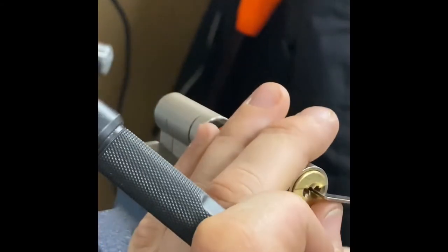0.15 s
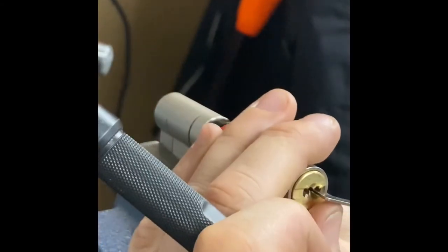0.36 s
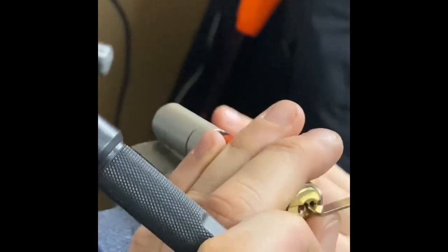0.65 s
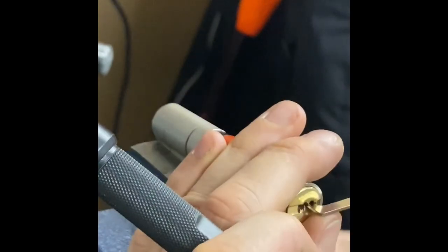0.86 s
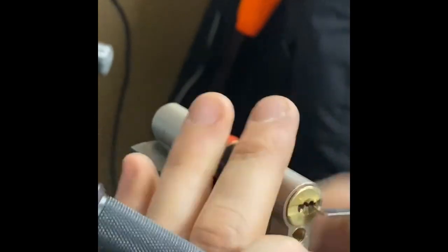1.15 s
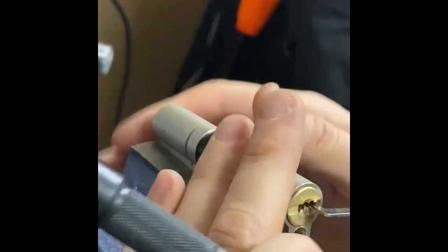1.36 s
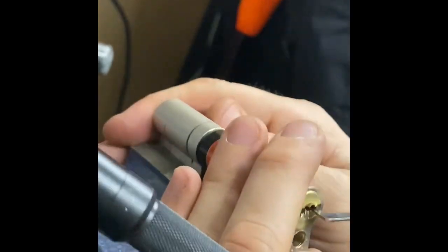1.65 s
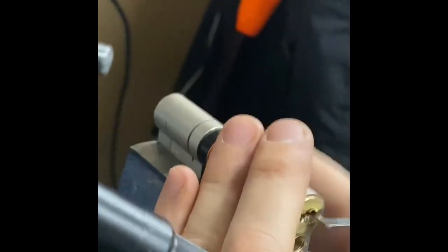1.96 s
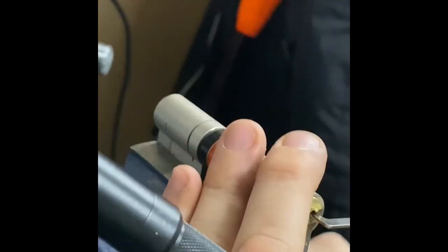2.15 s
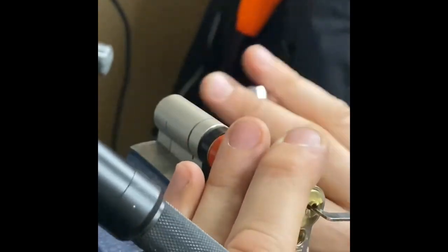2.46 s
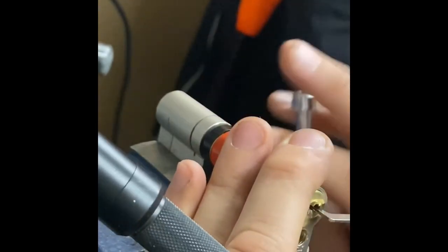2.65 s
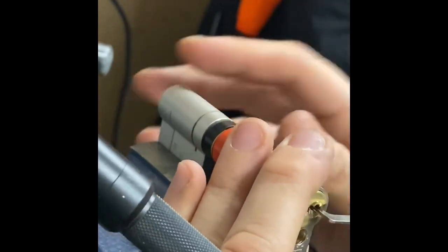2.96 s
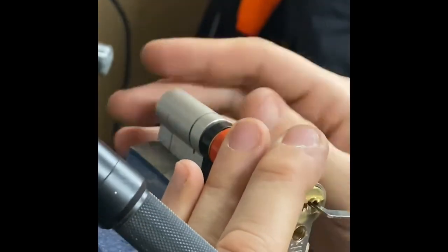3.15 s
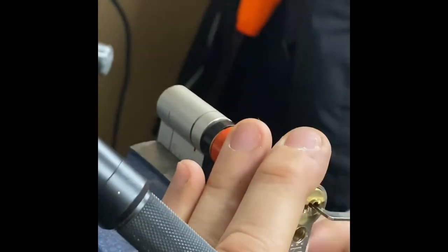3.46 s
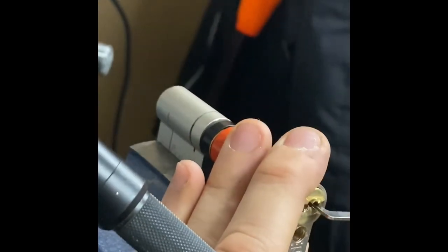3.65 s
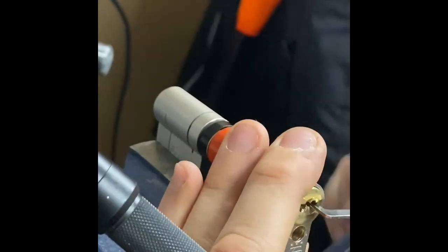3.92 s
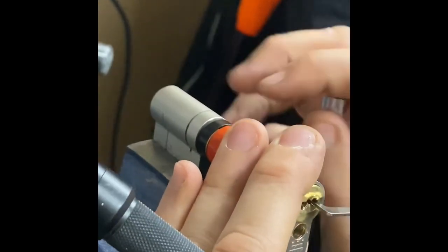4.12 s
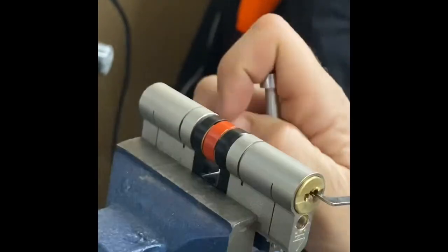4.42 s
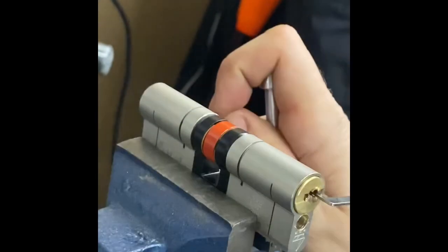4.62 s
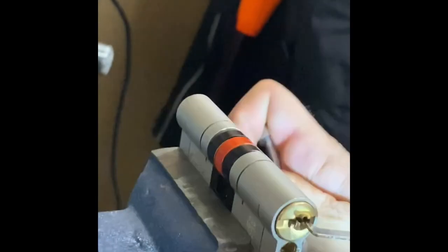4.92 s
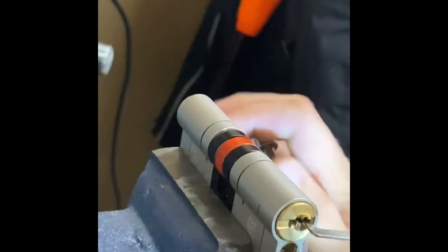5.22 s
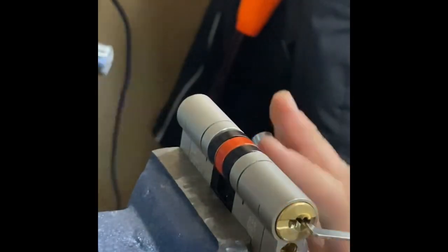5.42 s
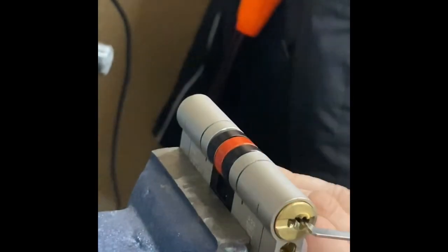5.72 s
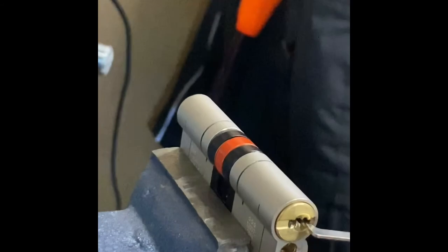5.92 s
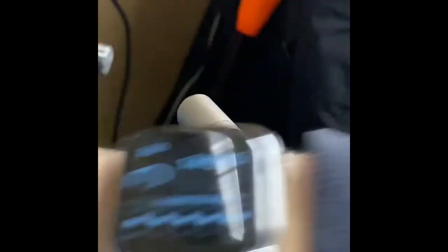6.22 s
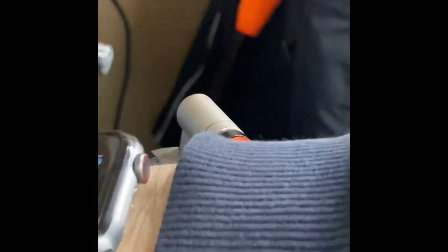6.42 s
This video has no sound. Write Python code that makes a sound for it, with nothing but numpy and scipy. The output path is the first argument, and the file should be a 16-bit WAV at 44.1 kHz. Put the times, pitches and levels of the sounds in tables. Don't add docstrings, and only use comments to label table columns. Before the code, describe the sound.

Very close, mostly quiet handling of a lock cylinder in a vise, over steady soft workshop air. At 0.35-0.6 s a cluster of dull knocks, crisp clicks and a short metallic scrape, with low bench movement. Light ticks and scrapes return around 0.95-1.2 s, then faint rubs. Near 1.8 s a small tick; at 2.05-2.2 s firmer clicks and a dull knock. Light grazes at 2.6 s lead to the loudest event at 2.74 s: a hard, bright steel clack with a tiny bounce and airy shivering tail. Soft rubs follow near 3.0-3.4 s, a sharp bright tap at 3.5 s, a thin ping at 3.85 s. Low hand thumps land at 4.2 and 4.6 s, with scraping to 4.8 s. A softer thump at 5.5 s, a stuttering, low-pitched skid at 5.7-6.0 s, then a brief brush at 6.23 s and quiet.

```python
import sys
import numpy as np
from scipy import signal
from scipy.fft import rfft, irfft, next_fast_len
from scipy.io import wavfile
from scipy.ndimage import uniform_filter1d

SR = 44100
rng = np.random.default_rng(int(sys.argv[2]) if len(sys.argv) > 2 else 0)


def inscribe(sig):
    pcm = np.round(np.clip(np.atleast_2d(sig).T, -1, 1) * 32767)
    wavfile.write(sys.argv[1], SR, pcm.astype(np.int16))


def gain_from_db(level_db):
    decades = np.asarray(level_db, float) / 20
    return 10 ** decades


N = 290166

# (lower edge [Hz], upper edge [Hz])
BANDS = [(230, 950), (950, 2450), (2750, 8500), (8500, 15800)]
# (frequency [Hz], level [dB], t60 [s])
LOCK_MODES = [(340, 0.5, 0.007), (420, 9, 0.01), (556, -3.5, 0.013), (854, -4, 0.035), (1090, -5, 0.0071),
              (1155, -4, 0.044), (1760, 6.5, 0.0084), (1940, -1, 0.0056), (2540, 0.5, 0.0075),
              (3850, -6, 0.0035), (4420, -4.5, 0.0098), (5160, -5.5, 0.017), (5760, -5.5, 0.051),
              (6220, -1.5, 0.022), (7004, -8, 0.0094), (8000, -9, 0.016), (10900, 1.5, 0.0079),
              (11800, -1, 0.015), (14100, -3, .01)]
CLICK_TICK_DB = [-1, -4, 1, -1.5]
RUB_TICK_DB = [1.3, 3.5, 6.1, 5]
# (time [s], peak [dB], weight [dB], hardness [dB], pitch of part touched [Hz])
STEEL_TICKS = [(0.4362, -33, -24, -4, 1740), (0.5645, -43, -2, -27, 1125), (0.9615, -53.5, 5, -11, 1820),
               (1.0217, -45, 11.5, -3.5, 1700), (1.065, -54, 8, -2, 1810), (1.2024, -59, -17, 3, 1790),
               (1.2171, -57.5, -15, 5.5, 1700), (1.789, -46.5, -2.5, -2.5, 1096),
               (2.055, -41, -1, -0.5, 1760), (2.1121, -36.5, -16, -5, 872), (2.611, -40, 9.5, -3, 1870),
               (2.6259, -42, 13, -30.5, 1860), (2.6378, -40.5, -12.5, -7.5, 1870),
               (3.5, -28.5, 4.5, -8, 1747), (3.6304, -65, 11, 6, 780), (3.8445, -49.5, -33.5, 6.5, 1720),
               (3.8796, -63.5, -15, -5, 1660), (4.1652, -42.5, -7, -23, 2640), (4.2005, -54.5, 0, 6, 760),
               (4.3702, -68, -11, 13, 1947), (4.6448, -46, -4.5, -11, 1158), (5.0492, -68.5, 0, 5, 1760),
               (5.651, -66.5, -6, 8.5, 1780), (5.7172, -62.5, 0, 10, 1856)]
# (time [s], peak [dB], weight [dB], hardness [dB], pitch [Hz])
HANDLE_KNOCKS = [(0.2318, -57, 5, -39, 875), (0.3456, -55, 15, -32, 870), (0.3674, -39.5, 6, -31, 720),
                 (0.3915, -34.5, -25, -20.5, 740), (1.0984, -37.5, 5.5, -12.5, 1940),
                 (1.136, -45.5, 3, -32, 2450), (1.15, -55, 15, -28, 1310), (1.1577, -43.5, -6, -43, 1820),
                 (1.1656, -51.5, 15, -29, 1890), (1.46, -54, -27, -35, 1134), (1.6324, -54, -4, -8, 1840),
                 (1.8664, -61.5, -16, -11, 1260), (1.961, -62, -22, -18, 2020),
                 (2.1274, -34, -13, -33, 756), (2.1908, -56.5, 14.5, -31, 750),
                 (3.1364, -50.5, 10, -49.5, 1540), (3.3043, -52, -4, -33.5, 1260),
                 (3.3495, -44, -18.5, -39, 1748), (4.0686, -59, -19, -17, 888),
                 (4.1731, -50, -11.5, -14, 718.5), (4.58, -45.5, 9.5, -33, 1120),
                 (5.2004, -64, 5.5, -8, 923), (5.5151, -56, 6.5, -25.5, 1149),
                 (6.2324, -47, -19, -14, 1502)]
SETTLE_DB, SETTLE_S = -13, 0.088
TOP_FOLLOWS = 0.91

# (frequency [Hz], level [dB], t60 [s])
CLACK_MODES = [(164, -17.5, 0.047), (306, -20.5, 0.047), (390, -19.5, 0.054), (470, -17, 0.036),
               (780, -10.5, 0.011), (848, -11.5, 0.021), (1055, -1, 0.016), (1260, -13.5, 0.011),
               (1690, -3.5, 0.018), (1770, -6, 0.018), (2560, -23.5, 0.02), (4970, -7.5, 0.0074),
               (5300, -11.5, 0.012), (6075, -14.5, 0.005), (8100, -12.5, 0.014), (10860, -10, 0.0076)]
# (frequency [Hz], level [dB], t60 [s])
TOOL_MODES = [(5636, 0, .5), (11170, -3, .25), (10710, -12, .15), (8160, -24, .08)]
# (time [s], level [dB], time until gripped [s], overtones [dB])
TOOL_BLOWS = [
    (2.611, -54, 0.3, 4),
    (2.668, -45, 0.31, -4.5),
    (2.7407, -21.5, 0.016, -3.5),
    (2.762, -34, 0.037, 8.5),
    (3.501, -34.5, 0.0067, 10),
]
# (frequency [Hz], level [dB], t60 [s])
PICK_MODES = [(14160, 2, .1), (4200, -13, .05), (6700, -13, .15), (8800, -13, .15), (11350, -6, .15)]
# (time [s], level [dB], time until gripped [s], overtones [dB])
PICK_BLOWS = [
    (3.846, -37.5, 0.03, -8.5),
]
# (time [s], peak [dB], centre [Hz], t60 [s])
PART_SNAPS = [(0.37, -63, 5700, 0.018), (.424, -48, 4500, 0.014), (0.4354, -39, 6400, 0.012),
              (0.4338, -42, 4100, .008), (.45, -50, 8500, .02), (0.565, -51, 5240, 0.0082),
              (.9467, -68, 2860, 0.014), (0.9613, -60, 5400, 0.047), (1.029, -59, 6450, 0.0084),
              (1.058, -65, 4270, 0.021), (1.079, -65, 4300, .012), (1.151, -45, 1700, 0.0075),
              (1.1498, -66, 5330, 0.0087), (1.1685, -49, 2310, 0.011), (1.201, -76, 6250, .03),
              (1.631, -60, 1490, 0.012), (1.79, -48, 3550, 0.0096), (1.789, -67, 9100, 0.011),
              (1.979, -65.5, 2780, 0.15), (2.1108, -43.5, 2930, 0.017), (2.1124, -44, 9200, .012),
              (2.127, -45.5, 6070, 0.01), (2.1907, -47.5, 895, 0.02), (2.7408, -18.5, 14200, .015),
              (2.7406, -17, 10370, .012), (2.7411, -13.5, 5702, .012), (3.8445, -45.5, 15300, .03),
              (3.8445, -50, 10500, .02), (2.757, -34, 14700, .06), (3.35, -70, 5990, .015),
              (3.4978, -33, 10900, 0.017), (3.499, -27, 5570, 0.0394), (3.5026, -33, 7200, .03),
              (3.5022, -36, 11400, 0.05), (3.8435, -43.5, 3520, 0.013), (3.85, -60.5, 710, 0.055),
              (3.8448, -50, 10960, .015), (3.8423, -46, 13470, 0.032), (4.166, -47, 3470, 0.011),
              (4.173, -46, 2570, 0.011), (4.176, -55, 3635, 0.013), (4.26, -67, 3900, 0.054),
              (4.58, -43, 1052, 0.022), (4.587, -45.5, 847, 0.011), (5.187, -57, 674, 0.041),
              (5.514, -53, 1010, 0.017), (5.521, -49.5, 590, 0.018), (5.661, -70, 4500, 0.013),
              (5.7192, -52, 4260, 0.012), (5.861, -65, 2450, 0.034), (5.862, -68.5, 3990, 0.024),
              (5.952, -60, 1880, 0.04), (5.955, -62.5, 3984, 0.031)]
# (time [s], peak [dB], centre [Hz], t60 [s])
PART_SHIVERS = [
    (2.749, -33.5, 11000, 0.29),
    (2.747, -39, 7460, 0.37),
    (2.748, -43, 4130, 0.19),
    (2.748, -47, 3088, 0.28),
    (3.508, -46, 11000, 0.21),
    (3.508, -45.5, 5940, 0.23),
    (3.867, -52, 13300, .1),
    (2.75, -42, 9895, .2),
    (4.18, -53, 900, 0.15),
    (5.726, -67, 1838, 0.3),
]

# (time of full pressure [s], rms [dB], rise [s], fall [s], hardness [dB])
FINGER_STROKES = [(.374, -63, 0.015, 0.059, -49), (.576, -64.5, 0.38, 0.056, -42),
                  (.76, -78.5, 0.018, 0.28, -23), (.86, -72, 0.32, 0.056, -13),
                  (1.468, -81, 0.013, 0.042, -23), (1.638, -60.5, 0.092, 0.028, -26),
                  (1.5, -96, 0.099, 0.24, 14.5), (1.99, -86, 0.03, 0.29, -3.5), (2.34, -74, 0.2, 0.17, -18),
                  (3.015, -70, 0.041, 0.052, -36.5), (3.045, -59.5, 0.052, 0.031, -42),
                  (3.134, -65, 0.024, 0.079, -40.5), (3.358, -60.5, 0.077, 0.066, -28.5),
                  (3.49, -72.5, 0.064, 0.022, -10), (4.062, -75.5, 0.04, 0.054, -12),
                  (4.59, -56.5, 0.0074, 0.019, -28), (5.054, -67, 0.091, 0.08, -6),
                  (5.202, -67, 0.065, 0.25, -19), (5.535, -68, 0.027, 0.087, -22),
                  (5.6, -69, 0.33, 0.17, -16.5)]
# (time of full pressure [s], rms [dB], rise [s], fall [s], hardness [dB])
SCRAPE_STROKES = [(.436, -46, 0.071, 0.085, -18.5), (.964, -52, 0.009, 0.04, -15.5),
                  (1.04, -65.5, 0.07, 0.082, -10.5), (1.152, -64.5, 0.12, 0.17, -12.5),
                  (1.81, -68, 0.039, 0.031, 1.5), (2.065, -48.5, 0.013, 0.032, -21),
                  (2.135, -61.5, 0.12, 0.18, -39), (2.62, -59, 0.011, 0.19, -8),
                  (2.674, -61, 0.13, 0.076, -15.5), (2.736, -47, 0.019, .012, -12),
                  (3.52, -59.5, 0.047, 0.21, -34), (3.87, -71, 0.072, 0.048, 3),
                  (4.17, -54, 0.012, 0.12, -10.5), (4.372, -80.5, .015, 0.28, 5),
                  (4.67, -56, 0.041, 0.065, -11.5), (4.715, -54, 0.12, 0.077, -15.5),
                  (4.76, -57.5, 0.06, 0.069, -20), (4.82, -73, 0.083, 0.13, -7),
                  (5.724, -71, 0.0502, 0.13, -1.5), (5.95, -71, 0.24, 0.52, -4.5),
                  (6.234, -55, 0.078, 0.061, -2), (6.3, -76, 0.078, 0.41, -6)]
LINGER = [0.87, 1, 0.96, 0.6]
# (time of full pressure [s], rms [dB], pitch [Hz], rise [s], fall [s])
PART_SINGS = [(.40, -66, 5660, 0.019, 0.08), (.41, -59, 3620, 0.026, 0.086), (.41, -46, 1695, 0.02, 0.078),
              (.428, -54, 2550, 0.012, .04), (.535, -73, 3500, 0.027, 0.071),
              (0.821, -76.5, 1740, 0.077, .1), (.975, -73, 5670, 0.023, 0.021),
              (.975, -65.5, 4280, 0.015, 0.018), (1.07, -63, 4380, 0.011, 0.017),
              (1.075, -67, 2520, 0.035, 0.058), (1.065, -80, 6500, .02, 0.061),
              (1.15, -86, 5800, 0.068, 0.033), (1.15, -65, 4160, 0.026, 0.02),
              (1.215, -66, 6300, 0.015, 0.017), (1.222, -64, 4260, 0.0086, 0.013),
              (1.225, -65.5, 1760, 0.049, 0.032), (1.26, -67, 2380, .03, 0.013),
              (2.736, -33.5, 1154, 0.011, 0.007), (2.78, -46.5, 1590, 0.044, 0.081),
              (2.8, -48.5, 1747, .04, 0.12), (2.78, -44, 1000, 0.041, 0.095),
              (2.775, -53.5, 672, .02, 0.13), (2.79, -49, 5550, .03, 0.097),
              (2.77, -51.5, 1270, 0.019, 0.086), (3.03, -58, 1710, 0.038, 0.04),
              (3.025, -59.5, 1135, 0.037, 0.042), (3.04, -54, 406.5, 0.039, 0.043),
              (3.138, -59.5, 1580, 0.022, 0.039), (3.145, -57, 475, 0.044, 0.052),
              (4.70, -73, 4240, 0.09, 0.12), (4.70, -64.5, 2530, .06, 0.043),
              (4.70, -54, 1160, 0.12, 0.084), (4.71, -59, 1660, 0.14, 0.14), (4.70, -92, 3050, .1, 0.14),
              (5.56, -68.5, 2220, 0.058, 0.14), (5.56, -67.5, 1283, .05, 0.093),
              (3.359, -61, 1747, 0.028, 0.045), (5.75, -70.5, 1825, .05, 0.11),
              (5.93, -71.5, 2050, 0.088, .12), (6.238, -60, 1990, .03, 0.029), (6.235, -70, 2880, .06, .06)]

# (time [s], level [dB], pitch [Hz], t60 [s])
SKIDS = [
    (5.724, -66.5, 376, 0.069),
    (5.762, -47.5, 406, 0.03),
    (5.808, -45.5, 447, 0.03),
    (5.855, -49.5, 453, 0.046),
    (5.903, -53, 438.4, 0.058),
    (5.95, -46, 447.7, 0.042),
    (5.999, -59, 462.5, 0.028),
]
# (time [s], peak [dB], pitch [Hz], t60 [s])
HAND_THUMPS = [
    (4.218, -23, 94, 0.061),
    (4.598, -20.5, 114.7, 0.046),
    (4.796, -44, 110.6, 0.067),
    (5.529, -34.5, 114.9, 0.064),
]
# (frequency [Hz], width [Hz])
BENCH_MODES = [(66, 41), (122, 55)]
# (time of full push [s], sway rms [dB], drumming above sway [dB], fade [s])
BENCH_PUSHES = [(0.0, -79, 0, 0.11), (0.389, -46, 8.5, 0.046), (0.486, -34.5, -3.5, 0.12),
                (0.578, -45, -1, 0.037), (0.856, -53, 0, 0.063), (1.036, -45.5, -4.5, 0.049),
                (1.15, -33.5, -30, 0.099), (1.38, -60.5, -25, 0.058), (1.676, -53, -14.5, 0.12),
                (1.915, -43, -15, 0.046), (2.091, -49, -16, 0.17), (2.378, -54.5, 5.5, 0.097),
                (2.661, -62.5, 1, 0.15), (2.769, -40.5, 0, 0.11), (3.049, -70.5, 2.5, 0.13),
                (3.4, -53.5, 2, 0.1), (3.548, -51.5, 4, 0.14), (3.88, -64.5, -1.5, 0.081),
                (4.251, -40.5, -5, 0.12), (4.496, -55, -42, 0.1), (4.63, -41.5, -2, 0.032),
                (4.681, -44.5, -3, 0.16), (4.82, -42, 0.5, 0.089), (5.078, -60.5, 5, 0.11),
                (5.272, -53.5, -1, 0.25), (5.545, -48.5, 6, 0.056), (5.79, -51, -12, 0.25),
                (6.03, -62, -3, 0.42), (6.278, -54.5, -6.5, 0.074), (6.47, -59, -18, 0.069)]

# (frequency [Hz], density [dB per Hz])
AIR_SPECTRUM = [(15, -34.5), (25, -17), (59, -0.5), (97, -3.5), (200, -16), (353, -12.5), (752, -27.5),
                (1330, -27.5), (1690, -31), (2680, -40), (4850, -41.5), (5860, -39.5), (15900, -56.5)]
# (frequency [Hz], t60 [s])
SHOP_T60 = [(100, 0.21), (300, 0.42), (1000, 0.14), (5000, 0.25), (12000, 0.24)]
# (frequency [Hz], lead [rad])
PORT_LEAD = [(0, 0), (400, -.2), (800, -.9), (1300, -.2), (1700, .15), (2600, 1.1), (3900, .1), (4620, 1.2),
             (5080, 5.3), (5250, 6.3), (6000, 6.8), (8000, 7.9), (10000, 8.2), (11500, 8.5), (12500, 8.9),
             (16000, 8.9)]
# (frequency [Hz], likeness [0-1])
PORT_SAME = [(100, 0.99), (400, 0.7), (750, 0), (1150, 0), (1600, 0.7), (4200, 0.4), (4700, 1), (5000, 1),
             (5600, 0.2), (9000, 0.93), (12500, 0.8)]
# (frequency [Hz], difference [dB])
PORT_LEFT = [(100, 0), (400, 3), (900, 2.5), (1600, 0), (15000, 0)]


def evened(x):
    return x / np.sqrt(np.mean(x ** 2) + 1e-20)


def read(points, hz):
    f, value = np.transpose(points)
    return np.interp(np.log(hz + 1), np.log(f + 1), value)


def add(mix, s, sound):
    part = mix[..., round(s * SR):][..., :sound.shape[-1]]
    part += sound[..., :part.shape[-1]]


def ring(modes, t):
    return sum(gain_from_db(db - 60 * t / t60) * np.sin(2 * np.pi * hz * t) for hz, db, t60 in modes)


def bandpass(order, edges_hz):
    return signal.butter(N=order, Wn=edges_hz, btype="band", fs=SR, output="sos")


def band_levels(low_db, hard_db, top_db):
    return np.array([low_db, 0, hard_db, top_db + TOP_FOLLOWS * hard_db])


def lock_answers(tick_db, spread_db):
    t = np.arange(2048) / SR
    place = rng.standard_normal((len(LOCK_MODES), 2))
    touched = [(hz * (1 + 0.015 * a), db + spread_db * b, t60)
               for (hz, db, t60), (a, b) in zip(LOCK_MODES, place)]
    answers = []
    for (lo, hi), bare_db in zip(BANDS, tick_db):
        band = bandpass(4, [lo, hi])
        inside = [mode for mode, at_rest in zip(touched, LOCK_MODES) if lo < at_rest[0] < 1.2 * hi]
        modes = signal.sosfilt(band, ring(inside, t))
        tick = signal.sosfilt(band, t == 0)
        answers.append(evened(evened(modes) + gain_from_db(bare_db) * evened(tick)))
    return np.array(answers) / np.sqrt(len(t))


def clicks(contacts, rise_s, rattle_s, top_db):
    out, t = np.zeros(N), np.arange(2048) / SR
    for s, db, weight_db, hard_db, hz in contacts:
        fade = gain_from_db(-60 * t / rattle_s) + gain_from_db(SETTLE_DB - 60 * t / SETTLE_S)
        rattle = rng.standard_normal(len(t)) * fade * (1 - np.exp(-t / rise_s))
        answer = gain_from_db(band_levels(weight_db, hard_db, top_db)) @ lock_answers(CLICK_TICK_DB, spread_db=-0.5)
        part = ring([(hz, 0, 0.012)], t)
        answer = answer + 2.0 * part / np.linalg.norm(part)
        add(out, s, gain_from_db(db - 4.0) * signal.fftconvolve(rattle, answer))
    return out


def clack():
    hit_s, hit_db = 2.7412, 4
    bounce_s, bounce_db = 0.0036, 0.5
    out, t = np.zeros(N), np.arange(6000) / SR
    crack = signal.sosfilt(bandpass(2, [4200, 11300]), rng.standard_normal(len(t)))
    crack = crack * gain_from_db(-9.5 - 60 * t / 0.017) * (1 - np.exp(-t / 0.0032))
    body = sum(ring([mode], t) * (1 - np.exp(-t * mode[0] / 4)) for mode in CLACK_MODES)
    bounce = ring(CLACK_MODES[:11], t * 1.01) * (1 - np.exp(-t / 0.0065))
    add(out, hit_s, gain_from_db(hit_db) * (crack + body))
    add(out, hit_s + bounce_s, gain_from_db(hit_db + bounce_db) * bounce)
    return out


def struck(modes, blows):
    out = np.zeros(N)
    for s, db, held, overtones_db in blows:
        t = np.arange(int(held * SR)) / SR
        steel = ring(modes[:1], t) + gain_from_db(overtones_db) * ring(modes[1:], t)
        edges = np.clip(np.minimum(held - t, t) / 0.0019, 0, 1)
        add(out, s, gain_from_db(db) * steel * edges)
    return out


def snaps():
    width = 0.26
    out, t = np.zeros(N), np.arange(8192) / SR
    for s, db, hz, t60 in PART_SNAPS + PART_SHIVERS:
        burst = rng.standard_normal(len(t)) * gain_from_db(-60 * t / t60) * (1 - np.exp(-t / 0.00018))
        edges = np.minimum(hz * (1 + width / 2) ** np.array([-1, 1]), [15000, 16000])
        burst = signal.sosfilt(bandpass(2, edges), burst)
        add(out, s, gain_from_db(db) * burst / abs(burst).max())
    return out


def swell(s, rise, fall):
    t = np.arange(0, N / SR + 0.01, 0.001)
    return np.minimum((t - s) / max(rise, 0.002), (s - t) / max(fall, 0.002))


def at_samples(level):
    return np.interp(np.arange(N) / SR, np.arange(len(level)) * 0.001, level)


def pressure(strokes, low_db, top_db):
    swing_db, roundness = 30, 0.96
    total = 0
    for s, db, rise, fall, hard_db in strokes:
        drop_db = swing_db * np.outer(LINGER, (-swell(s, rise, fall)) ** roundness)
        total = total + gain_from_db(db + band_levels(low_db, hard_db, top_db)[:, None] - drop_db)
    return total


def rubs():
    size = gain_from_db(0.36 * np.minimum(rng.exponential(1, N), 5))
    slips = rng.standard_normal(N) * size * (rng.random(N) < 1200 / SR)
    grip = evened(uniform_filter1d(rng.standard_normal(N), 300))
    slips = evened((evened(slips) + 0.7 * rng.standard_normal(N)) * gain_from_db(2.5 * grip))
    level = pressure(FINGER_STROKES, low_db=8, top_db=-9) + pressure(SCRAPE_STROKES, low_db=2.5, top_db=-9)
    driven = [slips * at_samples(band) for band in level]
    return signal.oaconvolve(driven, lock_answers(RUB_TICK_DB, spread_db=4.0), axes=1)[:, :N].sum(0)


def sings():
    width, roundness = 0.11, 1.6
    out, t = np.zeros(N), np.arange(-4000, 12000) / SR
    for s, db, hz, rise, fall in PART_SINGS:
        grip = evened(uniform_filter1d(rng.standard_normal(len(t)), size=200))
        slips = rng.standard_normal(len(t)) * gain_from_db(3.6 * grip)
        r = np.exp(-np.pi * width * hz / SR)
        poles = [1, -2 * r * np.cos(2 * np.pi * hz / SR), r * r]
        part = evened(signal.lfilter([1, 0, -1], np.convolve(poles, poles), slips))
        add(out, s + t[0], part * gain_from_db(db - 20 * np.maximum(-t / rise, t / fall) ** roundness))
    return out


def judder():
    out, t = np.zeros(N), np.arange(5000) / SR
    for s, db, hz, t60 in SKIDS:
        wander = uniform_filter1d(rng.standard_normal(len(t)), size=160)
        chatter = 1 + 0.3 * evened(uniform_filter1d(wander, size=160))
        skid = t + 0.24 * np.cumsum(chatter - 1) / SR
        top = ring([(hz, db + 15.0, t60), (hz * 0.99, db + 3.5, t60), (hz * 0.595, db + 0.5, t60)], skid)
        add(out, s, top * chatter * (1 - np.exp(-t / 0.0096)) ** 2 * gain_from_db(7.0))
    return out


def thumps():
    out, t = np.zeros(N), np.arange(5000) / SR
    for s, db, hz, t60 in HAND_THUMPS:
        add(out, s, ring([(hz, db + 7.5, t60)], t) * (1 - np.exp(-t / 0.0066)) ** 2)
    return out


def bench():
    rest_db, swing_db, rise_share = -79, 23.5, 0.86
    t, out = np.arange(N) / SR, np.zeros(N)
    for k, (hz, width) in enumerate(BENCH_MODES):
        level = gain_from_db(rest_db)
        for s, db, drum_db, fall in BENCH_PUSHES:
            level = level + gain_from_db(db + k * drum_db + swing_db * swell(s, rise_share * fall, fall))
        turn, r = np.exp(2j * np.pi * hz * t), np.exp(-np.pi * width / SR)
        poles = np.convolve([1, -r], [1, -r])
        shake = (turn * signal.lfilter([1], poles, rng.standard_normal(N) / turn)).real
        sway = np.sqrt(uniform_filter1d(shake ** 2, 3000))
        out += at_samples(level) * evened(shake / sway)
    return signal.sosfilt(signal.butter(N=3, Wn=38, btype="high", fs=SR, output="sos"), out)


def shop(x):
    taps, slots = np.zeros(SR // 2), np.arange(300, SR // 2 - 20, 20)
    taps[slots + rng.integers(0, 20, len(slots))] = rng.choice([-1., 1.], len(slots))
    hz, t, z = signal.stft(taps, SR, nperseg=256)
    fade = gain_from_db(-60 * t / read(SHOP_T60, hz)[:, None])
    tail = signal.istft(z * fade, SR, nperseg=256)[1]
    return signal.fftconvolve(x, tail / np.linalg.norm(tail))[:N]


def room_tone():
    frames, hz = N // 256 + 5, np.fft.rfftfreq(1024, 1 / SR)
    a, b, patches = rng.standard_normal((frames, 513, 3)).T
    patches = evened(uniform_filter1d(uniform_filter1d(patches, 10, 0), 12, 1))
    z = (a + 1j * b) * gain_from_db(read(AIR_SPECTRUM, hz)[:, None] + 4.0 * patches)
    return gain_from_db(-69) * evened(signal.istft(z, nperseg=1024, noverlap=768)[1][:N])


def ports(direct, diffuse):
    size = next_fast_len(N + 4096)
    hz, t = np.fft.rfftfreq(size, 1 / SR), np.arange(N) / SR
    lag = np.exp(-2j * np.pi * hz / SR * rng.integers(15, 130, (3, 3, 1)))
    paths = ((lag - 0.55) / (1 - 0.55 * lag)).prod(0)
    turns = np.sqrt(2 / 3) * np.cos(2 * np.pi * (2.1 * t + np.arange(3)[:, None] / 3))
    scattered = (rfft(diffuse * turns, size) * paths).sum(0)
    same = np.clip(read(PORT_SAME, hz), 0, 1)
    hits, rest = rfft(direct, size), rfft(diffuse, size)
    shift = np.exp(-1j * np.interp(hz, *np.transpose(PORT_LEAD)))
    right = (hits + same * rest + np.sqrt(1 - same ** 2) * scattered) * shift
    lean = gain_from_db(read(PORT_LEFT, hz) / 2)
    return irfft([(hits + rest) * lean, right / lean], size)[:, :N]


def scene():
    ticks = clicks(STEEL_TICKS, rise_s=0.0003, rattle_s=0.0048, top_db=-9)
    knocks = clicks(HANDLE_KNOCKS, rise_s=0.00158, rattle_s=0.0132, top_db=-34)
    ringing = clack() + struck(TOOL_MODES, TOOL_BLOWS) + struck(PICK_MODES, PICK_BLOWS)
    hits = ticks + knocks + ringing + snaps() + sings() + judder() + thumps()
    strokes = rubs()
    echo = gain_from_db(-15.5) * shop(hits + strokes)
    return ports(hits, strokes + echo + bench() + room_tone())


def band_limit(x):
    return signal.sosfilt(signal.butter(12, 16080, fs=SR, output="sos"), x)


def record(dry):
    hiss = signal.lfilter([1], [1, -0.7], rng.standard_normal(dry.shape))
    hiss = signal.sosfilt(signal.butter(N=6, Wn=12300, fs=SR, output="sos"), hiss)
    bass_cut = signal.butter(N=2, Wn=40, btype="high", fs=SR, output="sos")
    heard = signal.sosfilt(bass_cut, dry + gain_from_db(-93) * hiss)
    return band_limit(heard)


dry = scene()
out = record(dry)
inscribe(out)
```